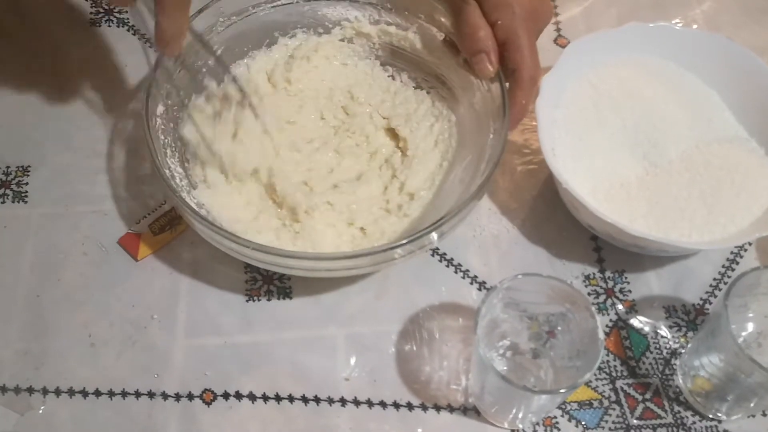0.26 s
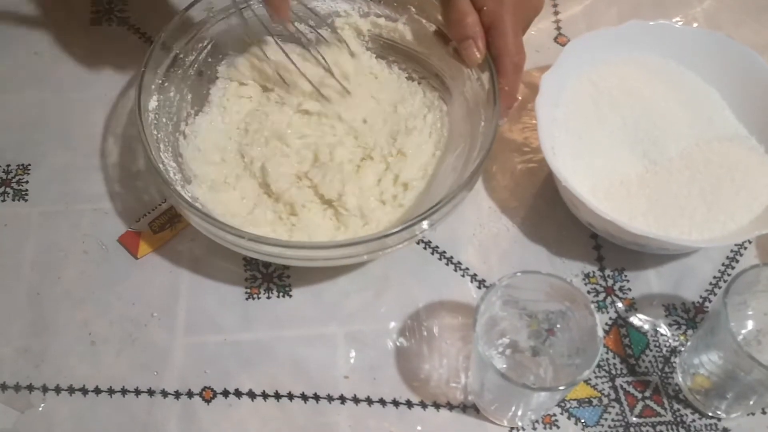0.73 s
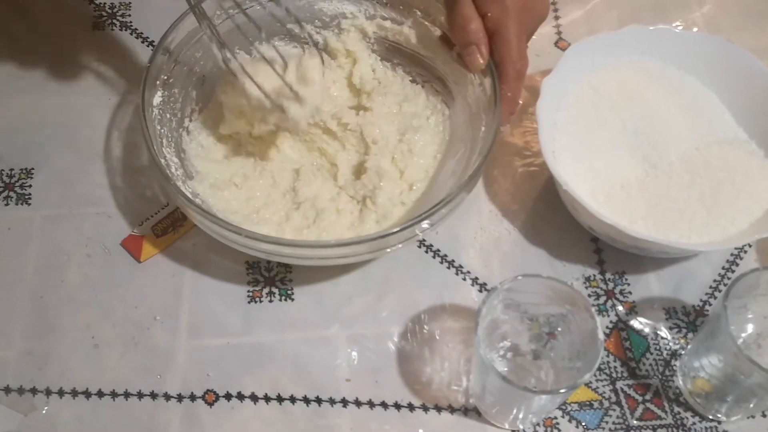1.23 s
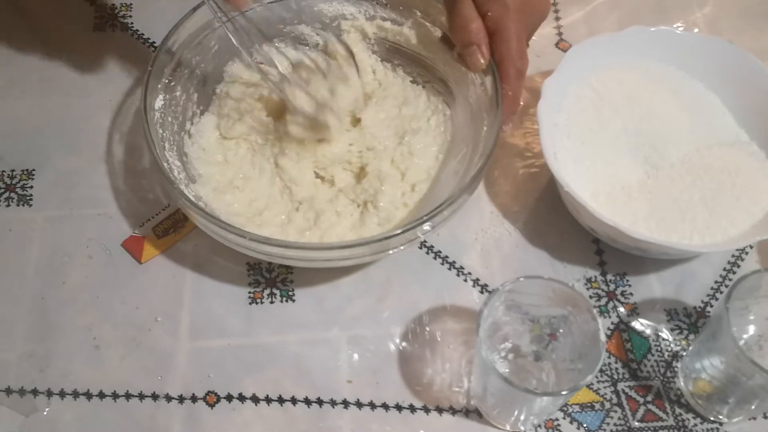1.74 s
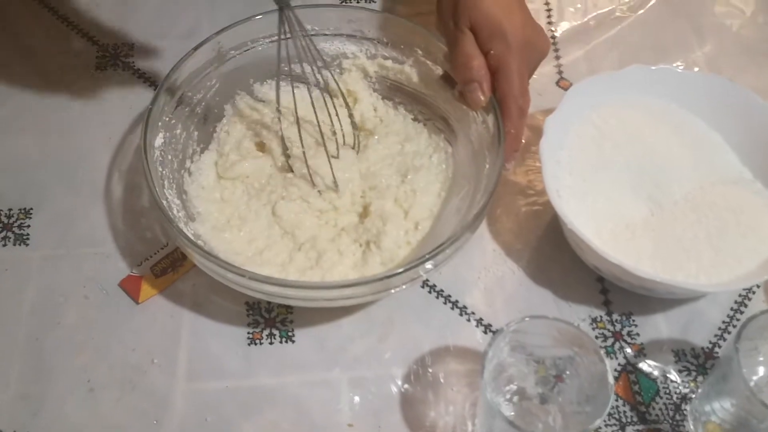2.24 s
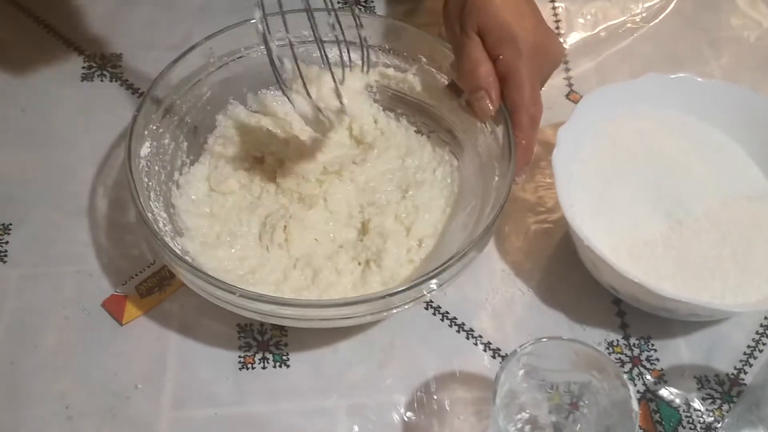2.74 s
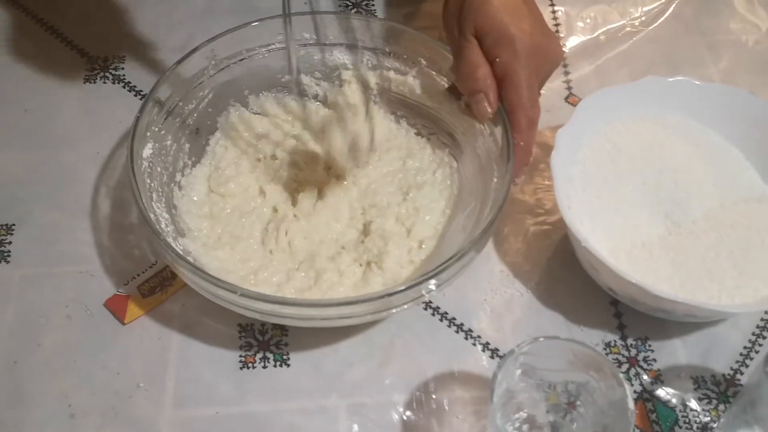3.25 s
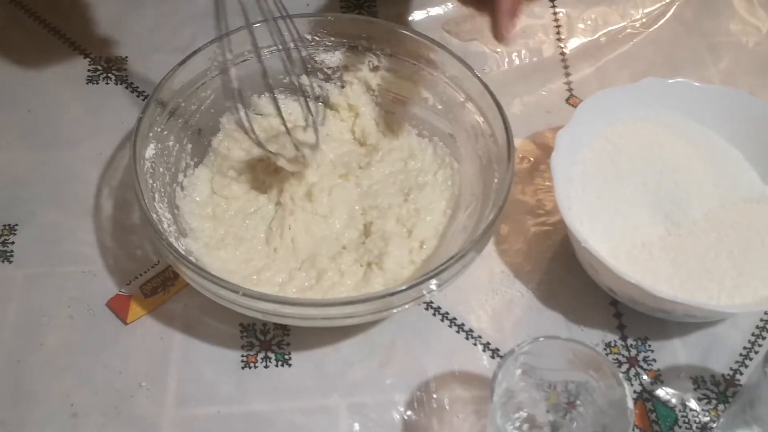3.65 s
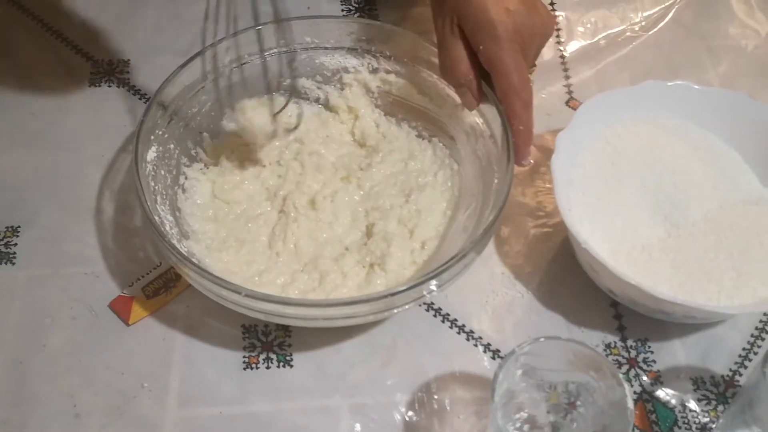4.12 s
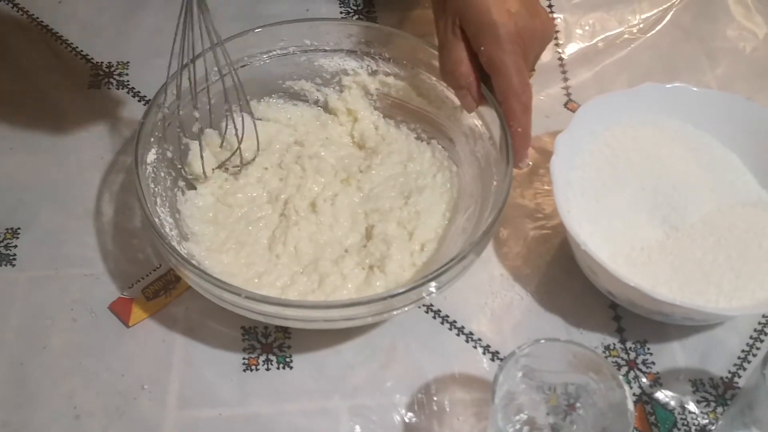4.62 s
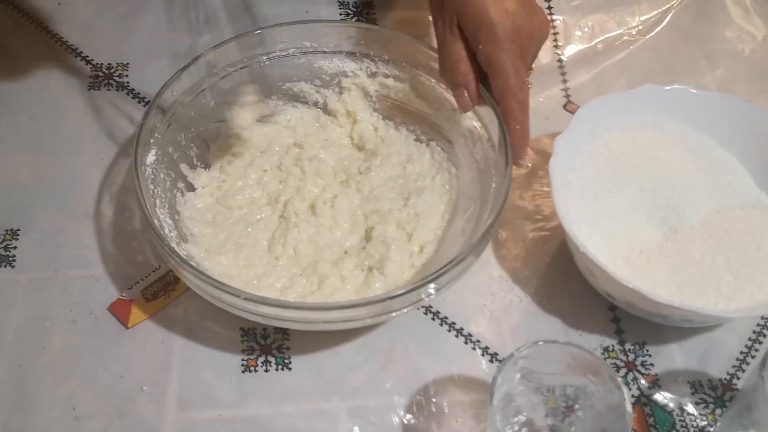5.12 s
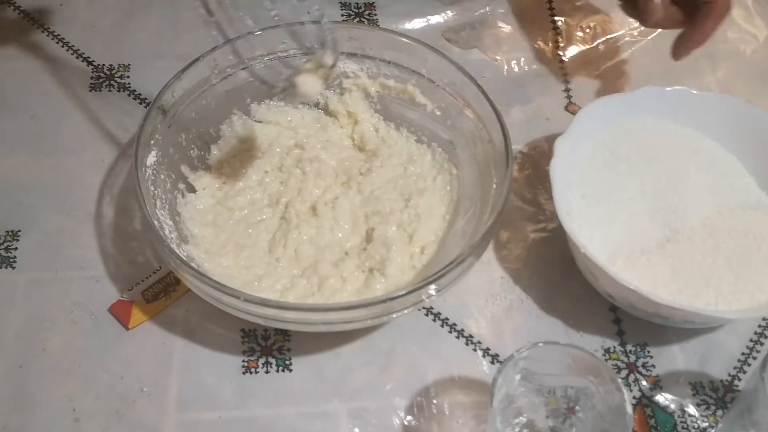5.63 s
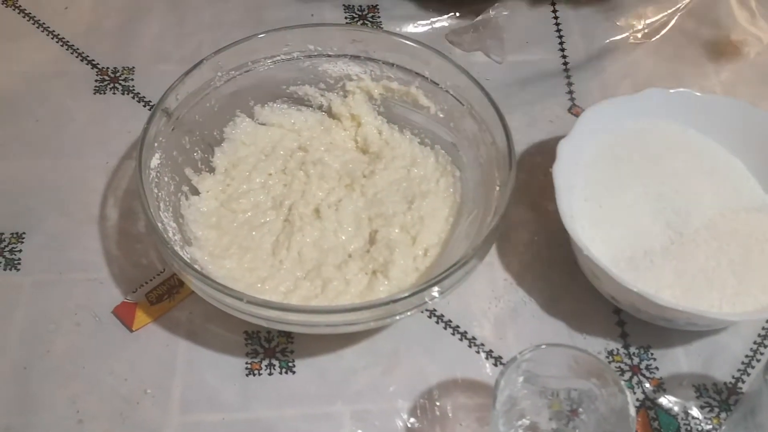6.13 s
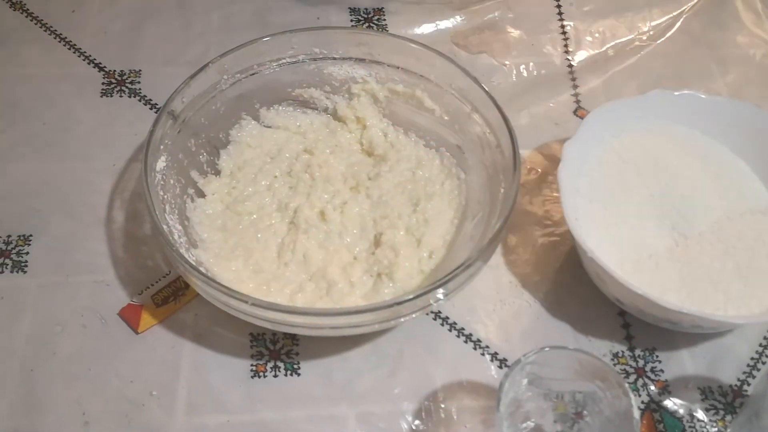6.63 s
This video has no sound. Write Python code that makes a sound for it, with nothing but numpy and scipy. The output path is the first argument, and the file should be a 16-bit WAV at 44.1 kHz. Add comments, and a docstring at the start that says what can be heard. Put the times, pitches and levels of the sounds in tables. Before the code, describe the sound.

A whisk works thick dough in a glass bowl, heard near in a small room. Quiet scraping strokes and sticky pops come first, with a muffled knock, then a spaced series of low, soft thuds. A quick run of bright, rattling wire-on-glass raps is by far the loudest part, each ringing briefly. Light brushing sounds follow, then near silence with a low hum.

```python
"""Kitchen table, small room, faint hum: a wire whisk works soft dough in a glass bowl, heard close.
Dough crackles and smacks (clouds of tiny pops); the table thuds under six dabs (pushed modes).
After one early graze, seven raps on the rim shed the dough: ringing glass modes and a noise clash of wires.
The whisk is put aside with soft rustles (coloured grains)."""
import sys
import numpy as np
from scipy import signal
from scipy.fft import rfft, irfft, next_fast_len
from scipy.io import wavfile
from scipy.ndimage import map_coordinates

SR = 44100
rng = np.random.default_rng(int(sys.argv[2]) if len(sys.argv) > 2 else 0)


def dump_mix(stems):
    """Bounce the given channels to the path in sys.argv[1] as a 16-bit WAV at rate SR."""
    frames = np.atleast_2d(stems).T  # one column per channel
    limited = np.clip(frames, -1, 1)  # hard clip at full scale
    pcm = np.round(limited * 32767).astype(np.int16)
    wavfile.write(sys.argv[1], SR, pcm)


N = 302967
TIME = np.arange(N) / SR
AGE = TIME[:2 ** 15]  # seconds since the onset of one event

# Whisk on bare glass, one graze and seven raps on the rim. Each row: start in seconds, level of ring
# and thud in dB, delay of the other wires in seconds, dough left on the whisk (0-1), clash level in dB,
# then the relative level in dB of each of the five low rings.
RAPS = [(0.275, -34, 0.0042, 0.5, -59, 7, -9, 1.5, 2, 1),
        (3.9414, -1.5, 0.0019, .8, -19, 3, -16, -0.5, -2.5, -1),
        (4.2875, -2.5, 0.0033, 1, -16, 3, -2, -0.5, 3.5, -3),
        (4.596, -2.5, 0.0021, 0.95, -16.5, 3.5, -3, 1, -0.5, -11),
        (4.8081, -4.5, 0.0038, .75, -22, 3, -13.5, -5, 6, 0),
        (4.9911, -3.5, 0.0027, 0.36, -17, 5, -10, -10.5, 2, 7.5),
        (5.163, -1.5, 0.0019, .25, -17.5, 8, -14, -8.5, 2, -2),
        (5.3282, -1, .0045, 0.042, -18, -2, -3.5, -1.5, -4, 0.5)]
# Whisk dabbed into the dough and pulled out. Each row: start in seconds, thud level in dB, share of the
# free ring time (0-1), smack going in in dB, time until pulled out in seconds, smack coming out in dB.
DABS = [(2.594, -35, 0.85, -45, 0.051, -42.5), (2.816, -41.5, 0.93, -54.5, .077, -54.5),
        (3.06, -40.5, 0.87, -55, 0.057, -55.5), (3.298, -36, 0.66, -52, .059, -54),
        (3.512, -48.5, 1, -58.5, 0.083, -64.5), (3.809, -34, 0.27, -57, 0.052, -61.5)]
# Spectrum of wet crackle and wire ticks. Each row: frequency in Hz, relative density in dB.
WET_COLOUR = [(2000, -18.5), (3500, -9.5), (4600, 1), (5700, 3.5), (7000, 2), (10000, 1), (12500, -11),
              (15500, -37)]


def undb(db):
    """Decibels to gain."""
    return 10 ** (np.asarray(db) / 20)


def fade(t60_s):
    """Exponential decay, down 60 dB after t60_s."""
    return np.exp(-np.log(1000) * AGE / t60_s)


def pan(db):
    """Left and right gains for a left-minus-right level difference."""
    return undb(np.array([[db], [-db]]) / 2)


def add(out, start_s, sound):
    """Mix a sound in at start_s."""
    i = max(int(start_s * SR), 0)
    out[:, i:i + sound.shape[-1]] += sound[..., :N - i]


def colour(x, points, tilt_db=0):
    """Give x a spectrum, tilted by tilt_db per octave about 4 kHz; rms 1."""
    size = next_fast_len(x.shape[-1], True)
    hz, db = np.transpose(points)
    octave = np.log2(np.maximum(np.fft.rfftfreq(size, 1 / SR), 1))
    spectrum_db = np.interp(octave, np.log2(hz), db)
    spectrum_db -= 12 * np.maximum(np.log2(hz[0]) - octave, 0)  # 12 dB per octave below the first point
    spectrum_db += tilt_db * np.maximum(octave - 12, -3)
    y = irfft(rfft(x, size) * undb(spectrum_db), size)[..., :x.shape[-1]]
    return y / np.sqrt(np.mean(y ** 2))


def noise(size, alike_hz=500):
    """Noise at two microphone ports: alike in the bass, unrelated in the treble."""
    mid, side = rng.standard_normal((2, size))
    side = signal.sosfilt(signal.butter(1, alike_hz, "high", fs=SR, output="sos"), side)
    return np.array([mid + side, mid - side])


def arrive(x):
    """A nearby sound at the two ports: the right one gets it a little later."""
    port_lag_s = 0.00018
    steps = np.arange(len(x))
    return np.array([x, map_coordinates(x, [steps - port_lag_s * SR])])


def grains(size, rate_hz, spread_db):
    """Dense tiny pops of sticky films that tear; a few are much stronger than the rest."""
    chance = rng.random(size)
    strength = np.minimum(rng.exponential(size=size), 5)
    pops = (chance < rate_hz / SR) * undb(spread_db * strength)
    envelope = signal.lfilter([1], [1, -0.93], pops)  # each pop dies within a millisecond or so
    return arrive(rng.standard_normal(size)) * envelope


def room(x, wet_db, t60_s, treble_t60_s):
    """Add the diffuse echo of a small kitchen: noise tails that decay separately below and above 2.5 kHz."""
    hiss = noise(len(AGE))
    low = signal.sosfilt(signal.butter(2, 2500, fs=SR, output="sos"), hiss)
    high = signal.sosfilt(signal.butter(2, 2500, "high", fs=SR, output="sos"), hiss)
    onset = np.clip(AGE / 0.0039 - 0.4, 0, 1)
    echo = (low * fade(t60_s) - high * fade(treble_t60_s)) * onset
    echo /= np.sqrt(np.sum(echo ** 2, axis=1, keepdims=True))
    return x + undb(wet_db) * signal.fftconvolve(x, echo, axes=1)[:, :N]


def push(body, length_s):
    """A rounded push of unit area on a ringing body: the longer, the duller."""
    force = np.sin(np.pi * np.minimum(AGE / max(length_s, 3 / SR), 1)) ** 2
    return signal.fftconvolve(body, force / force.sum())[:len(AGE)]


def modes(table, share=1):
    """Free ringing of a body, its decay times scaled by share."""
    return sum(undb(db) * fade(t60_s * share) * np.sin(2 * np.pi * hz * AGE) for hz, db, t60_s in table)


def between(clean, loaded, load):
    """A property of the whisk, from clean to laden with dough."""
    return clean + (loaded - clean) * load


def kitchen():
    """Still room air as coloured noise, and the narrow drone of an appliance around 247 Hz."""
    # Each row: frequency in Hz, relative density in dB.
    air_colour = [(25, 6.5), (55, -8.5), (95, -6.5), (130, -7.5), (200, -16), (300, -21), (600, -26.5),
                  (900, -23.5), (1300, -25), (2050, -17), (2900, -27), (5600, -32.5), (10000, -40.5),
                  (15500, -49.5)]
    air = colour(noise(N), air_colour) * undb(-64.5)
    drone = colour(noise(N), [(220, -40), (247, 0), (277, -40)]) * undb(-78)
    return air + drone


def rubbing(rasp_gain, crackle_gain, rate_hz, spread_db):
    """Rubbing contact: a dull rasp and a fine crackle, each following the strength of the stroke."""
    # Each row: frequency in Hz, relative density in dB.
    rasp_colour = [(300, -63), (600, -29), (770, -4), (1020, -12), (1300, -0.5), (1550, 1), (1900, 11.5),
                   (2230, 7.5), (2800, -2), (3600, -5), (4500, -14.5), (8000, -24)]
    rasp = colour(grains(N, 7500, 2.7), rasp_colour) * pan(-6)
    crackle = colour(grains(N, rate_hz, spread_db), WET_COLOUR)
    return room(rasp * rasp_gain + crackle * crackle_gain, 0, 0.14, 0.24)


def strokes(rub_offset_db, wet_offset_db):
    """The whisk is drawn through the dough: rasp and crackle follow the level curves of each stroke."""
    # Two turns round the bowl, one list each. Each row: time in seconds,
    # rubbing in dB before rub_offset_db, wet crackle in dB before wet_offset_db.
    turns = [
        [(0.0, -68.5, -67), (0.168, -70.5, -66.5), (0.258, -63, -61), (0.286, -53, -59), (0.32, -66, -63),
         (0.414, -54.5, -60.5), (0.504, -79, -68), (0.55, -94, -100)],
        [(0.77, -63, -66), (0.856, -67.5, -72.5), (0.894, -79, -55), (0.902, -69.5, -61), (1.154, -74.5, -72),
         (1.17, -66, -61.5), (1.272, -99, -89), (1.28, -86, -93)],
    ]
    # Whisk drawn slowly up through the dough. Each row: as in the turns.
    lift = [(2.18, -83, -77), (2.3, -67.5, -97), (2.385, -60.5, -83)]
    rasp_gain, crackle_gain = np.zeros((2, N))
    for curve in [*turns, lift]:
        s, rasp_db, crackle_db = np.transpose(curve)
        gate = np.clip(np.minimum(TIME - s[0], s[-1] - TIME) / 0.02 + 1, 0, 1)
        rasp_gain += gate * undb(np.interp(TIME, s, rasp_db) + rub_offset_db)
        crackle_gain += gate * undb(np.interp(TIME, s, crackle_db) + wet_offset_db)
    return rubbing(rasp_gain, crackle_gain, rate_hz=4400, spread_db=4.0)


def thuds():
    """Each push rocks the table; a hand that leans on it stops it sooner."""
    # Pushes other than dabs and raps. Each row: start in seconds, level in dB, push length in seconds,
    # share of the free ring time (0-1).
    other_pushes = [(.008, -51.5, 0.0064, 0.96), (0.13, -55, .0046, 0.43), (0.705, -51, .0048, 1),
                    (1.539, -40.5, 0.002, 1), (3.877, -41.5, .013, 0.48)]
    # Table with the bowl on it. Each row: frequency in Hz, level in dB, free t60 in seconds.
    table_modes = [(36, -28.5, 0.12), (61, -5, 0.61), (75.34, -7.5, 0.3), (88.5, -5, 0.32),
                   (138, -16.5, 0.13), (158, -17.5, 0.44), (251.7, -4.5, 0.25), (287.3, 3.5, 0.095),
                   (404, -26, 0.03)]
    dab_lag_s, dab_push_s, rap_lag_s = 0.006, 0.0061, 0.0049
    out = np.zeros((2, N))
    for start_s, db, push_s, share in other_pushes:
        add(out, start_s, undb(db) * push(modes(table_modes, share), push_s))
    for start_s, db, share, *_ in DABS:
        add(out, start_s + dab_lag_s, undb(db) * push(modes(table_modes, share), dab_push_s))
    # a cleaner whisk pushes the table less and more briefly
    for start_s, db, _, load, *_ in RAPS:
        thud_db = between(-47, -28, load)
        push_s = between(0.0007, 0.0042, load)
        add(out, start_s + rap_lag_s, undb(db + thud_db) * push(modes(table_modes), push_s))
    return room(out, -10, 0.3, 0.3)


def flutter(rate_hz):
    """Random swings of amplitude and phase at each port, rate_hz new values a second; rms near 1."""
    steps = np.arange(1024)
    real, imaginary = rng.standard_normal((2, 2, len(steps)))
    swings = [np.interp(AGE * rate_hz, steps, port) for port in real + 1j * imaginary]
    return np.sqrt(3 / 4) * np.array(swings)


def raps():
    """One wire meets the glass, the others land a moment later; they clash briefly and the bowl rings on."""
    # Glass bowl. Each row: frequency in Hz, level in dB, t60 in seconds, left minus right in dB, blur (0-1).
    bowl_modes = [(482, -50, .4, 3, .4), (1260, -27, .33, -5, .08), (1780, -34, .2, -5, .85),
                  (2293, -12, .19, -11, .04), (2480, -28, .11, -6, .8), (3537, -18, .21, 2, .25),
                  (3690, -28, .2, 0, .7), (4950, -23, .2, 4, .55), (5090, -32, .2, 5, .3),
                  (6556, -22, .21, 8, .22), (6966, -34, .2, 0, .5), (7200, -34, .23, 0, .8),
                  (8280, -28, .18, 1, .6), (8408, -33, .17, 2, .5), (9300, -31, .15, 0, 1),
                  (10120, -30, .23, -10, .45), (12130, -32, .19, -5, .7), (14240, -35, .17, 1, .5)]
    # Modes with a level of their own in each rap: frequency in Hz.
    low_rings_hz = [482, 1260, 2293, 3537, 4950]
    # Clash of the wires. Each row: frequency in Hz, relative density in dB.
    wire_colour = [(150, -19.5), (450, -26), (900, -9.5), (1500, -6.5), (2100, 2), (2900, -7.5), (3600, 0),
                   (4250, -11.5), (5000, 0.5), (6000, -1), (7500, 1), (9500, -0.5), (11000, -5.5),
                   (13000, -6), (14800, -18), (15600, -29.5)]
    ring, clash = np.zeros((2, 2, N))
    ports = np.array([[1], [1j]])  # each tone reaches the two ports out of step
    for start_s, db, lag_s, load, clash_db, *low_db in RAPS:
        bright_db = between(6, -9, load)  # per octave: less dough, brighter rap
        first = np.clip(AGE / 0.0007, 0, 1)
        later = np.clip((AGE - lag_s) / 0.0016, 0, 1)
        contact = (first + later) / 2
        low_ring_db = dict(zip(low_rings_hz, low_db))
        for hz, mode_db, t60_s, pan_db, blur in bowl_modes:
            # the place of the blow sets the low modes, its hardness the upper ones
            weight_db = low_ring_db.get(hz, bright_db * np.log2(max(hz / 5600, 1)))
            tone = contact * fade(t60_s) * np.exp(2j * np.pi * (hz * AGE + rng.random()))
            # rattling wires and near echoes blur each line into a narrow band
            blurred = np.sqrt(1 - blur) * ports + np.sqrt(blur) * flutter(230 + 0.012 * hz)
            add(ring, start_s, undb(db + mode_db + weight_db) * pan(pan_db) * (tone * blurred).real)
        burst = 0.87 * first * fade(0.046) + later * np.exp(-np.maximum(AGE - lag_s, 0) / 0.0082)
        rattle = colour(noise(len(AGE)), wire_colour, 0.1 * bright_db)
        add(clash, start_s, undb(clash_db) * burst * rattle)
    return room(ring, -15.0, 0.34, 0.25) + room(clash, -8, 0.4, 0.26)


def smack(db, tilt_db):
    """A short cloud of pops; the weaker it is, the more slowly the dough lets go."""
    # Each row: frequency in Hz, relative density in dB.
    dough_colour = [(150, -10.5), (340, -8.5), (520, -30), (800, 1), (1100, -8), (1950, 7.5), (2900, -5),
                    (4300, -11.5), (5600, -6.5), (7200, -8), (10000, -7), (13000, -27.5), (15500, -18.5)]
    swell_s = 0.0042 * undb(0.15 * (-50.5 - db))  # 4.2 ms at -50.5 dB
    swell = AGE / swell_s * np.exp(1 - AGE / swell_s)
    cloud = grains(len(AGE), 9000, 2.5)
    return undb(db) * swell * colour(cloud, dough_colour, tilt_db)


def smacks():
    """Dough tears off the wires or drops back, twice in each dab; now and then a wire ticks."""
    # Lone smacks of dough. Each row: start in seconds, level in dB, treble tilt in dB per octave.
    lone_smacks = [(.684, -40.5, -1), (.727, -44, -1.5), (1.517, -42.5, -1.5), (1.532, -27.5, -1),
                   (1.776, -55, 1), (1.855, -65, 3), (2.381, -48, 1), (5.811, -58, 9)]
    # Dry ticks of the wires. Each row: start in seconds, level in dB, treble tilt in dB per octave.
    wire_ticks = [(.729, -32, 0), (2.305, -33.5, 7), (2.601, -34, -18), (2.876, -46, -10), (3.302, -37, -8),
                  (3.3608, -28.5, -13), (3.367, -36, -10), (3.58, -52.5, 10), (3.655, -56, 8),
                  (3.821, -49.5, 3)]
    out, ticks = np.zeros((2, 2, N))
    for start_s, db, tilt_db in lone_smacks:
        add(out, start_s, smack(db, tilt_db))
    for start_s, _, _, in_db, stay_s, out_db in DABS:
        add(out, start_s, smack(in_db, tilt_db=1.5))
        add(out, start_s + stay_s, smack(out_db, tilt_db=2))
    for start_s, db, tilt_db in wire_ticks:
        tick = colour(arrive(rng.standard_normal(len(AGE))), WET_COLOUR, tilt_db)
        add(ticks, start_s, undb(db) * fade(0.0035) * tick)
    return room(out * pan(-3), -3, 0.28, 0.27) + room(ticks, -11, 0.28, 0.27)


def knocks():
    """Dough cushions the whisk on the bowl wall, so the bowl gives only a short, dull note."""
    # Whisk against the wall through the dough. Each row: start in seconds, level in dB, push length in seconds.
    wall_knocks = [(.6865, -49.5, 0.00018), (1.5358, -26.5, 0.00056), (1.5442, -38.5, 0.00014),
                   (1.904, -58.5, 0.00046), (2.892, -52.5, .00018), (3.813, -46, 0.00078)]
    # Bowl damped by dough. Each row: frequency in Hz, level in dB, t60 in seconds.
    damped_modes = [(258, -13, .09), (310, -18, .07), (390, -16, .09), (740, -8, .035), (1270, -11, .04),
                    (1950, -3, .06), (2230, 1, .08), (3600, -13, .05), (5700, -11, .03)]
    out = np.zeros((2, N))
    for start_s, db, push_s in wall_knocks:
        add(out, start_s, undb(db) * push(modes(damped_modes), push_s))
    return room(out * pan(-4), -6, 0.3, 0.25)


def rustles():
    """Each brushing movement swells, holds or is cut short, and dies away; the firmer ones are crisper."""
    # Whisk put aside. Each row: start in seconds, time until release in seconds, level in dB at full swell.
    brushes = [(5.523, 0.044, -55), (5.763, .16, -51.5), (5.967, 0.12, -60), (6.163, 0.038, -56),
               (6.334, .06, -62.5), (6.403, 0.047, -58)]
    attack_s, release_s = 0.082, 0.033
    strength = np.zeros(N)
    for start_s, length_s, db in brushes:
        attack = np.clip((TIME - start_s) / attack_s, 0, 1)
        release = np.exp(-np.maximum(TIME - start_s - length_s, 0) / release_s)
        strength += undb(db) * attack * release
    crackle_gain = undb(0.5) * strength ** 1.125  # grows faster than the rubbing
    return rubbing(strength, crackle_gain, rate_hz=7100, spread_db=4.5)


def scene():
    """Stirring, dabbing, rapping, putting the whisk aside."""
    stirring = strokes(rub_offset_db=2.0, wet_offset_db=-2.0)
    return kitchen() + stirring + thuds() + raps() + smacks() + knocks() + rustles()


def record(dry):
    """The recorder cuts the top: a steep elliptic low-pass at 15.8 kHz."""
    return signal.sosfilt(signal.ellip(8, 0.2, 70, 15800, fs=SR, output="sos"), dry)


dry = scene()
out = record(dry)
dump_mix(out)
```